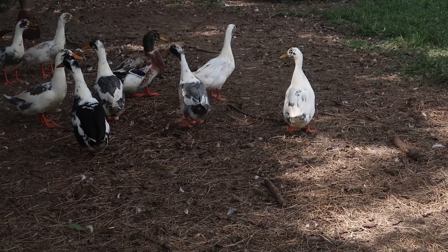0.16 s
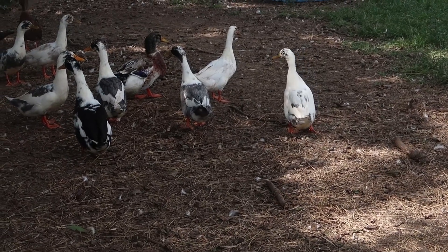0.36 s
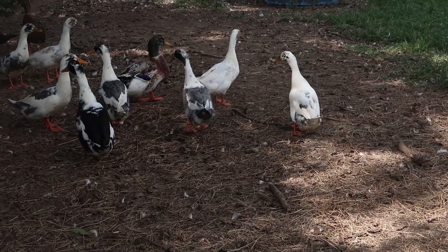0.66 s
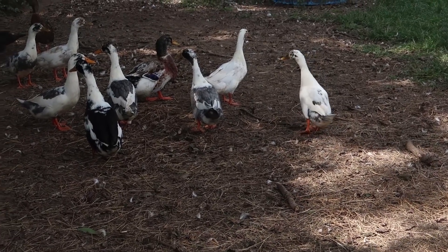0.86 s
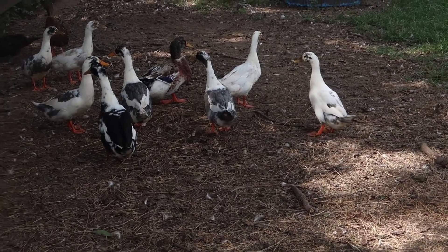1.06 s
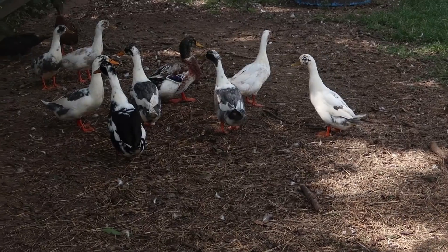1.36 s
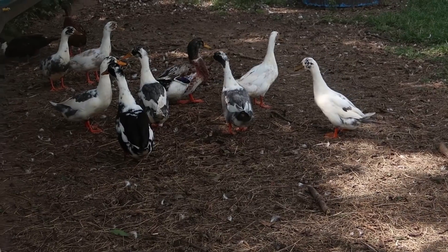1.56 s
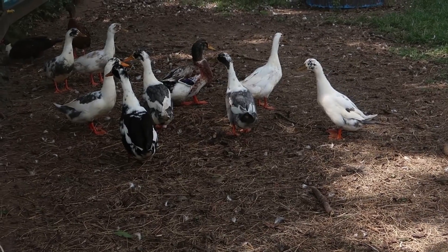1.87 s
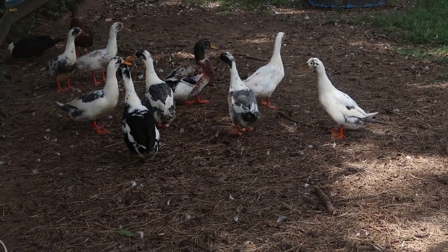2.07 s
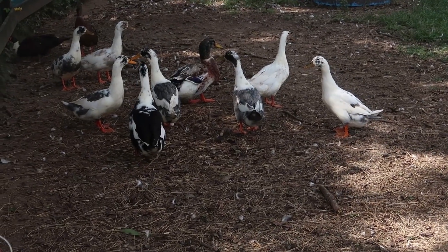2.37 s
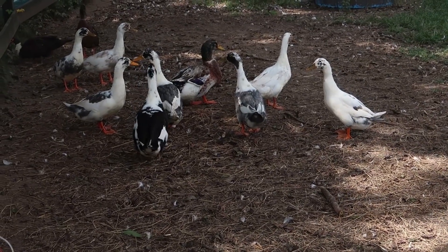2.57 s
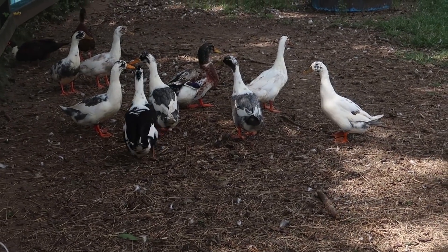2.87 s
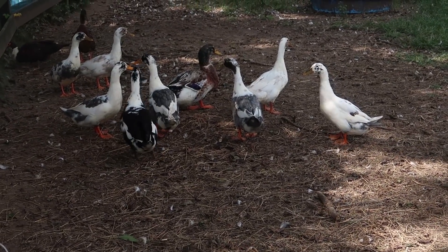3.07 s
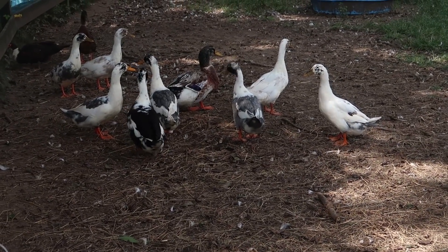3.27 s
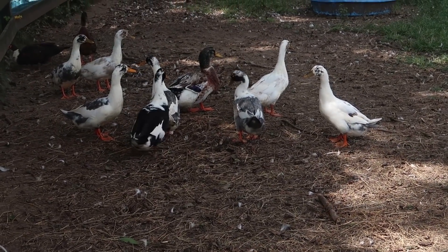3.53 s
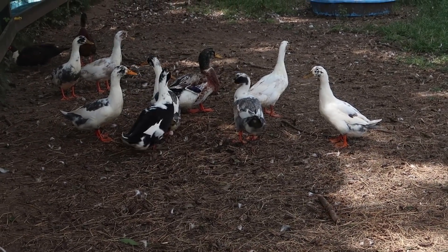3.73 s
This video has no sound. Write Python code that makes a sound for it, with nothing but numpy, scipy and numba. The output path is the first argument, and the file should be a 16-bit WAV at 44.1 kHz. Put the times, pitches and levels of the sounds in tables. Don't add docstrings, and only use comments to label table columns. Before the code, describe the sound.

One loud, nasal duck quack comes first, then three quieter low drake rasps, tiny peeps and a small quack, while cockerels crow far off; a hoarse nearer crow ends amid wind buffeting a handheld camera microphone.

```python
import sys
import numpy as np
from scipy import signal
from scipy.fft import rfft, irfft, next_fast_len
from scipy.io import wavfile
from scipy.ndimage import uniform_filter1d
from numba import njit

SR = 44100
rng = np.random.default_rng(int(sys.argv[2]) if len(sys.argv) > 2 else 0)


def output_pcm(signal):
    pcm = np.clip(np.atleast_2d(signal).T, -1, 1) * 32767
    wavfile.write(sys.argv[1], SR, np.round(pcm).astype(np.int16))


def natural_amplitude(level_db):
    exponent = np.asarray(level_db, float) / 20
    return 10 ** exponent


N = 171990


@njit
def ring(x, g, k):
    y, band, low = np.empty(len(x)), 0., 0.
    for i in range(len(x)):
        v = (band + g[i] * (x[i] + 1e-18 - low)) / (1 + g[i] * (g[i] + k))
        band, low, y[i] = 2 * v - band, low + 2 * g[i] * v, k * v
    return y


def resonance(x, hz, width_hz, shift=1.):
    return ring(x, np.tan(np.pi * hz * shift / SR) + 0 * x, width_hz / hz)


def steep_resonance(x, hz, width_hz, shift=1.):
    return resonance(resonance(x, hz, width_hz, shift), hz, width_hz, shift)


def unit(x):
    return x / np.sqrt(np.mean(x ** 2))


def walk(rate):
    hold = int(SR / rate)
    steps = np.repeat(rng.standard_normal(N // hold + 1), hold)
    return 1.188 * uniform_filter1d(uniform_filter1d(steps, hold), hold)[:N]


def curves(rows):
    t, rows = np.arange(N) / SR, np.array(rows, float).T
    columns = [np.interp(t, rows[0], c) for c in rows[1:]]
    return columns + [(t >= rows[0, 0]) & (t <= rows[0, -1])]


def throat(x, rows, shift=0.99, patchy_db=0.):
    total = 0
    for k, (hz, width_hz, db) in enumerate(rows):
        gain = (-1) ** k * natural_amplitude(db + patchy_db * walk(55))
        total = total + gain * steep_resonance(x, hz, 1.4 * width_hz, shift)
    return unit(total)


@njit
def pulse(hz, stretch, size, weak, limp):
    out, phase, p, k = np.zeros(len(hz) + 1), np.empty(len(hz)), 0., 0
    for i in range(len(hz)):
        step = hz[i] * stretch[k] / SR / (1 - limp[i] if k % 2 else 1 + limp[i])
        p += step
        if p >= 1:
            p, k = p - 1, k + 1
            a = size[k] * (weak[i] if k % 2 else 1.)
            out[i] += a * p / step
            out[i + 1] += a * (1 - p / step)
        phase[i] = p
    return out[:-1], phase


def rasp(hz, weak_db, jitter, scatter_db, air_db):
    timing, strength = rng.standard_normal((N // 50, 2)).T
    weak_db = weak_db + 0 * hz
    stretch = np.clip(1 + jitter * timing, .3, 3)
    limp = .012 * weak_db
    flaps, phase = pulse(hz, stretch, natural_amplitude(scatter_db * strength), natural_amplitude(-weak_db), limp)
    air = unit(np.exp(-2 * phase) * rng.standard_normal(N))
    return unit(flaps) + natural_amplitude(air_db) * (air + 4 * np.diff(air, prepend=0))


def clear(hz, effort_db, flicker_db, rate, count):
    turn = 2 * np.pi * np.cumsum(hz * (1 + 0.00449 * walk(35))) / SR
    dull_db = .2 * (effort_db - effort_db.max())
    total = 0
    for k in range(1, count + 1):
        total = total + natural_amplitude(flicker_db * walk(rate) + k * dull_db) * np.cos(k * turn)
    return total


def eddy_grains():
    strength = rng.standard_normal(N) * natural_amplitude(3. * rng.exponential(size=N))
    return strength * (rng.random(N) < 500 / SR)


def rumble(db, hz, edges):
    roll = resonance(eddy_grains(), 100., 97., hz / 100)
    roll = unit(resonance(roll, 100., 194., hz / 100) / np.sqrt(hz))
    rough = 0.4 * natural_amplitude(db + 18.5 + 6.9 * walk(56)) ** .5 * unit(eddy_grains())
    return unit(signal.sosfilt(edges, roll + rough))


# t/s, level/dB, eddy pitch f/Hz
GUSTS = [(0, -74, 90), (.04, -25.5, 92), (.08, -45, 90), (.105, -31, 94), (.16, -31.5, 90), (.2, -62, 60.4),
         (1.7, -70, 61.4), (2.02, -54, 60), (2.5, -60, 60), (2.58, -41, 78), (2.8, -53, 69),
         (3.0, -28.5, 78.5), (3.2, -24, 61), (3.26, -27, 70), (3.45, -15.5, 103), (3.52, -21.5, 143),
         (3.7, -24.5, 128), (3.9, -31, 91)]
# t/s, peak/full scale (negative sucks)
BIG_PUFFS = [(3.375, -0.36), (3.426, 0.23), (3.44, 0.044), (3.456, 0.74), (3.496, 0.26), (3.609, 0.26),
             (3.525, 0.06), (3.644, -0.0029), (3.82, 0.065), (3.853, 0.093), (3.681, -0.27), (3.712, -0.21)]


def wind():
    db, hz, _ = curves(GUSTS)
    low_edge = signal.butter(3, 52, "high", fs=SR, output="sos")
    top_edge = signal.butter(6, 488, fs=SR, output="sos")
    edges = np.vstack([low_edge, top_edge])
    t = np.arange(N) / SR
    big = np.zeros(N)
    for start, peak in BIG_PUFFS:
        u = (t - start) / .001
        big += peak * (np.exp(-u ** 2) - 0.59 * np.exp(-(u - 2) ** 2))
    shared = rumble(db, hz, edges) * natural_amplitude(db + 2.7 * walk(18)) + signal.sosfiltfilt(top_edge, big)
    late = np.interp(t - 0.00067, t, shared)
    own = steep_resonance(rumble(db, hz, edges), 180., 300.) * natural_amplitude(db - 8)
    own = own + resonance(shared, 263., 360.) * (1 - natural_amplitude(5.5 / 2))
    return np.array([shared + own, late - own])


def coloured(points):
    n = next_fast_len(N)
    f, (hz, db) = np.arange(n // 2 + 1) * SR / n + 1, np.array(points, float).T
    spectrum = rfft(rng.standard_normal(n)) * natural_amplitude(np.interp(np.log(f), np.log(hz), db))
    band = np.floor(2 * np.log2(f))
    total = 0
    for b in range(8, 29):
        swell_db = (walk(3.4) + walk(18)) * 14 / b
        total = total + irfft(spectrum * (band == b), n)[:N] * natural_amplitude(swell_db)
    return unit(total)


# f/Hz, level/dB per Hz
HUM_COLOUR = [(18, -64), (30, -6.5), (171, 1.5), (384, -11.5), (524, -13), (6360, -28), (7830, -30),
              (10800, -32.5), (12000, -50.5)]
# f/Hz, level/dB per Hz
HISS_COLOUR = [(150, -55), (250, -16), (634, -14.5), (692, -17), (911, -14), (1240, -16), (5200, -20),
               (9030, -11.5), (15400, -19.5)]
# t/s, level/dB
THIN_TREBLE = [(0, -88), (.9, -83), (1.2, -79), (1.7, -69), (2.2, -69), (2.35, -64), (2.65, -66.5),
               (2.75, -86), (3.9, -82)]


def yard():
    insects = unit(steep_resonance(rng.standard_normal(N), 7710., 420.))
    thin_noise = unit(steep_resonance(rng.standard_normal(N), 12600., 5200.))
    mid = coloured(HUM_COLOUR) * natural_amplitude(-44) + insects * natural_amplitude(-64.5 + walk(15.))
    mid = mid + thin_noise * natural_amplitude(curves(THIN_TREBLE)[0] + 4.2 * walk(24.9))
    side = coloured(HISS_COLOUR) * natural_amplitude(-51)
    wind_db = uniform_filter1d(curves(GUSTS)[0], size=8000)
    gain_db = -0.29 * np.maximum(wind_db + 34.5, 0)
    return np.array([mid + side, mid - side]) * natural_amplitude(gain_db)


# t/s,
# length/s, start f/Hz, end f/Hz, level/dB
GLIDING_WHISTLES = [(0.082, 0.021, 2460, 2340, -54), (1.684, 0.027, 1730, 1930, -57),
                    (1.713, 0.02, 2150, 1620, -42.5), (1.748, 0.019, 2120, 1806, -40.5),
                    (1.8, 0.011, 2200, 1880, -43.5), (2.578, 0.073, 268.6, 324, -46.5),
                    (2.639, .16, 342.5, 377, -53.5), (1.902, 0.024, 1470, 1616, -58),
                    (1.947, 0.014, 2350, 1810, -54), (1.964, 0.018, 1950, 1800, -52.5)]


def whistles():
    out = np.zeros(N)
    for start, length, hz0, hz1, db in GLIDING_WHISTLES:
        u = np.linspace(0, 1, int(length * SR))
        hz = hz1 + (hz0 - hz1) * (1 - u) ** 1.52
        tone = np.sin(2 * np.pi * np.cumsum(hz) / SR)
        out[int(start * SR):][:len(u)] += 2.57 * natural_amplitude(db) * np.sin(np.pi * u) ** 0.14 * tone
    return out


# t/s, f/ratio
NECK_OF_DUCKS = [(.15, 1.014), (.175, 1.02), (.23, 1.017), (1.78, 1.02), (1.825, 0.93)]


def duck_call(rows, resonances):
    hz, db, weak_db, on = curves(rows)
    voice = rasp(hz, weak_db, jitter=.005, scatter_db=.6, air_db=-12)
    call = throat(voice, resonances, curves(NECK_OF_DUCKS)[0], patchy_db=0.5) * natural_amplitude(db) * on
    ground = 0.35 * np.roll(call, int(0.00226 * SR))
    return 0.97 * (call + ground)


# t/s, f/Hz, level/dB, loss of every second flap/dB
NEAR_QUACK = [
    (.137, 98.25, -65, -23.5),
    (.1385, 100, -23.5, 1.5),
    (.152, 191.3, -20.5, 4),
    (.172, 212.3, -18.5, -1.5),
    (.225, 222.6, -17, 4),
    (.27, 225, -15.5, 4),
    (.302, 221.1, -16.5, 6),
    (.312, 216.4, -19.5, 8),
    (.336, 207, -39, 3),
]
# f/Hz, width/Hz, level/dB
NEAR_DUCK_THROAT = [(225, 56, 2), (561, 122, 0.5), (1107, 110, -1), (1353, 120, 7.5), (1778, 250, -0.5),
                    (2044, 280, -3.5), (2350, 210, -6.5), (3500, 1200, -19.5), (5230, 450, -20.5),
                    (6430, 1450, -33.5)]


def near_duck():
    return duck_call(NEAR_QUACK, NEAR_DUCK_THROAT)


# t/s, f/Hz, level/dB
FIRST_FAR_CROW = [(.34, 428.5, -41), (.43, 466.5, -37.5), (.50, 498.6, -36.5), (.68, 518.9, -37.5),
                  (.87, 527, -34), (1.05, 521.2, -38), (1.21, 489.4, -36.5), (1.40, 450.3, -37),
                  (1.58, 368, -42.5)]
SECOND_FAR_CROW = [(1.329, 486.7, -53), (1.39, 491, -42.5), (1.52, 482, -46), (1.649, 468.4, -48),
                   (1.68, 470, -71)]
# f/Hz, width/Hz, level/dB
FAR_COCK_THROAT = [(493, 900, -13), (917, 320, -3), (1535, 310, -7), (2169, 145, 4), (2648, 220, 1.5),
                   (4200, 890, -23.5)]


def far_cockerels():
    far = 0
    for rows in (FIRST_FAR_CROW, SECOND_FAR_CROW):
        hz, db, on = curves(rows)
        voice = on * clear(hz, db, flicker_db=5.5, rate=40, count=9)
        far = far + throat(voice, FAR_COCK_THROAT) * natural_amplitude(db - 10.) * on
    return far


# t/s, length/s, peak level/dB
DRAKE_RASPS = [
    (0.378, .30, -34.5),
    (1.166, 0.29, -36),
    (2.004, 0.26, -36),
]
# f/Hz, width/Hz, level/dB
DRAKE_RESONANCES = [(1430, 130, 0.5), (1742, 69, 4.5), (2030, 108, 2), (2480, 114, 4), (2766, 210, -2),
                    (3750, 330, -20.5), (5780, 300, -18.5)]
DRAKE_NECK = (.985, 1.01, .98)


def drake():
    t, hz, gain, neck = np.arange(N) / SR, np.full(N, 100.), np.zeros(N), np.ones(N)
    for start, length, db in DRAKE_RASPS:
        u = (t - start) / length
        end = 1 + .035 / length
        on = (u > 0) & (u < 1.5)
        hz[on] = np.interp(u[on], [0, .7], [86, 100])
        neck[on] = np.interp(u[on], [0, .8, 1], DRAKE_NECK)
        shape_db = np.interp(u, [0, .2, .8, .95, end], [-30, -11, 0, -2, -25])
        gain += on * natural_amplitude(db + shape_db) * (u < end)
    voice = rasp(hz, 0, jitter=.025, scatter_db=2., air_db=-8)
    return throat(voice, DRAKE_RESONANCES, neck, patchy_db=2.5) * gain


# t/s, f/Hz, level/dB, loss of every second flap/dB
LITTLE_QUACK = [
    (1.728, 290, -45, 1.5),
    (1.74, 278.8, -34, 3),
    (1.76, 264.3, -33.5, 1.5),
    (1.78, 273.7, -34, -0.5),
    (1.80, 267.8, -39, 8),
    (1.825, 247, -35.5, 3),
    (1.838, 245, -71, -3),
]
# f/Hz, width/Hz, level/dB
LITTLE_THROAT = [(1118, 89, 6.5), (1564, 190, -1), (2104, 200, -1.5), (3260, 720, -18.5), (4740, 640, -22)]


def small_duck():
    return duck_call(LITTLE_QUACK, LITTLE_THROAT)


# t/s, f/Hz, level/dB
ROUGH_CROW = [
    (2.57, 272.3, -61),
    (2.63, 334, -55.5),
    (2.85, 339.2, -49),
    (2.885, 342, -31.5),
    (3.0, 363.5, -31.5),
    (3.2, 393.1, -32),
    (3.40, 400, -31.5),
    (3.42, 380, -44),
    (3.45, 364, -69),
]
# f/Hz, width/Hz, level/dB
NEAR_COCK_THROAT = [(728, 210, 3), (990, 260, -4), (1140, 130, 0), (1370, 112, -6), (1950, 170, -6.5),
                    (2414, 206, -3), (2790, 174, -6), (3600, 730, -18), (4750, 2500, -32)]
# t/s, f/ratio
NEAR_COCK_NECK = [(2.85, 0.95), (3.0, 0.98), (3.2, 0.984), (3.4, 1.045)]
# t/s, level/dB
BEAK_WHEEZE = [
    (2.59, -74),
    (2.64, -53.5),
    (2.87, -64),
]


def hoarse_cockerel():
    hz, db, on = curves(ROUGH_CROW)
    voice = rasp(hz, 1.8, jitter=.065, scatter_db=3., air_db=-7)
    crow = throat(voice, NEAR_COCK_THROAT, curves(NEAR_COCK_NECK)[0], patchy_db=2.) * natural_amplitude(db) * on
    crow = crow - resonance(crow, 1660, 220)
    db, on = curves(BEAK_WHEEZE)
    wheeze = throat(rng.standard_normal(N), [(2370, 320, 0)], patchy_db=2.) * natural_amplitude(db) * on
    return crow + wheeze


# t/s, f/Hz, level/dB
FALLING_NOTE = [
    (3.405, 372.3, -30.5),
    (3.425, 365.5, -23.5),
    (3.46, 359.8, -29),
    (3.49, 356, -36),
    (3.535, 346.2, -32.5),
    (3.595, 339.7, -34),
    (3.64, 324, -38.5),
    (3.665, 315, -49),
]
# f/Hz, width/Hz, level/dB
CLEAR_NOTE_THROAT = [(709, 112, 8), (1080, 460, -10), (1363, 99, 3.5), (2150, 350, -9), (2785, 380, -8),
                     (3670, 220, -12), (4800, 1500, -24)]


def clear_note():
    hz, db, on = curves(FALLING_NOTE)
    voice = clear(hz, 0 * db, flicker_db=2.5, rate=27, count=16)
    note = throat(voice, CLEAR_NOTE_THROAT) * natural_amplitude(db) * on
    return note - resonance(note, 697., 40.)


def place(x, pan_db, lag_s):
    t = np.arange(N) / SR
    return np.array([np.interp(t - lag_s, t, x) * natural_amplitude(pan_db / 2), x * natural_amplitude(-pan_db / 2)])


def echoes(x):
    t = np.arange(SR // 2) / SR
    tail = rng.standard_normal((3, len(t))) * np.exp(-np.log(1000) * t / .7) * (t > .004)
    differing = 1.34 * np.diff(uniform_filter1d(tail[1:], size=5), prepend=0) * 3
    tail = (tail[0] + differing) / np.sqrt(np.sum(tail[0] ** 2))
    return natural_amplitude(-19) * signal.fftconvolve(x, tail, axes=1)[:, :N]


def scene():
    air = wind() + yard()
    little = whistles()
    quack = near_duck()
    far = far_cockerels()
    rasps = drake()
    little = little + small_duck()
    near = hoarse_cockerel() + clear_note()
    birds = place(quack, pan_db=0, lag_s=.000015)
    birds = birds + place(little, pan_db=-1., lag_s=.00002)
    birds = birds + place(rasps, pan_db=-0.5, lag_s=.00002)
    birds = birds + place(far, pan_db=2., lag_s=.00002)
    birds = birds + place(near, pan_db=2.5, lag_s=.00002)
    return birds + echoes(birds + 2 * (near + far)) + air


def low_pass(x):
    return signal.sosfilt(signal.butter(12, 15570, fs=SR, output="sos"), x)


def record(dry):
    return low_pass(dry)


dry = scene()
out = record(dry)
output_pcm(out)
```